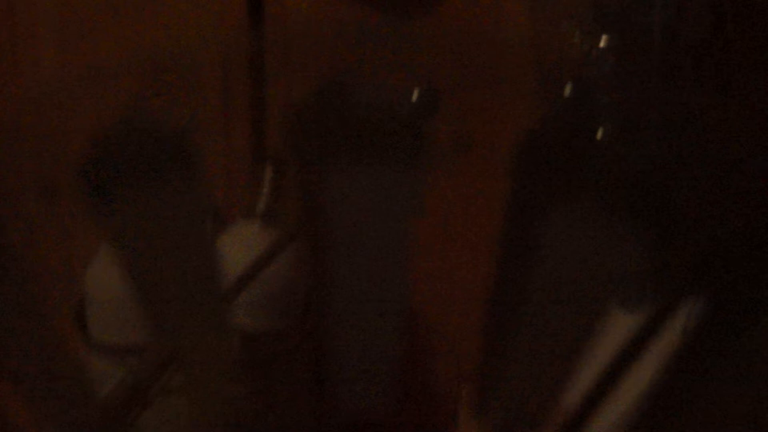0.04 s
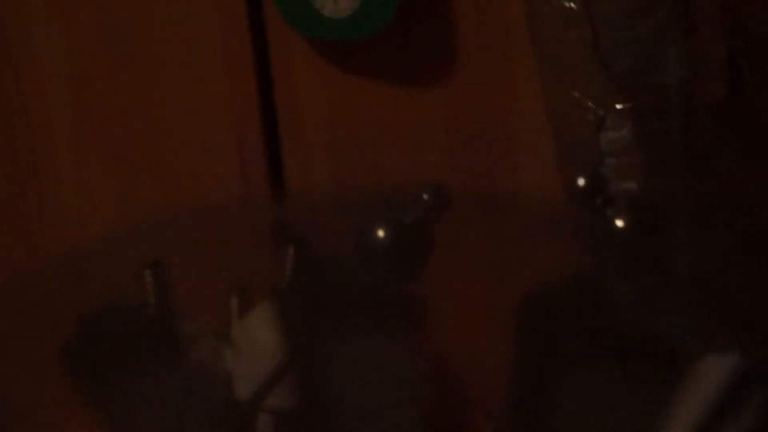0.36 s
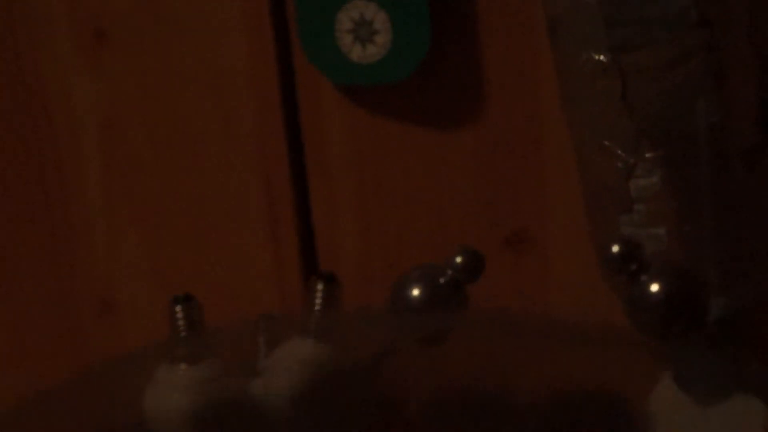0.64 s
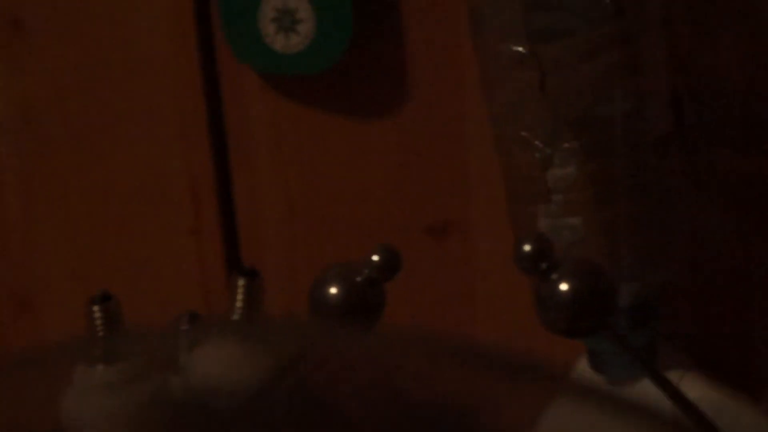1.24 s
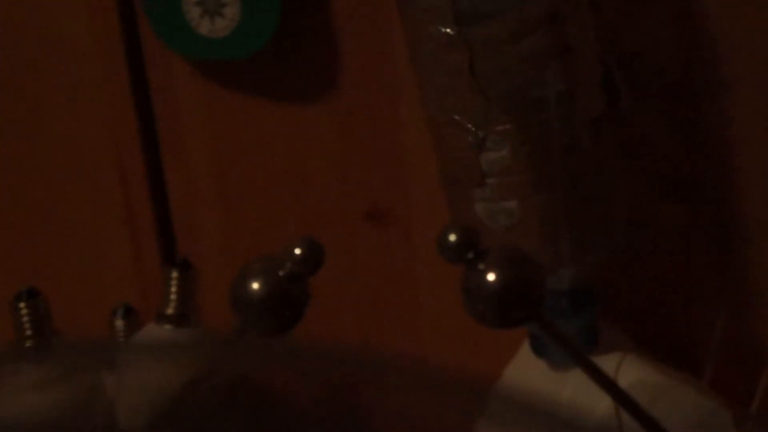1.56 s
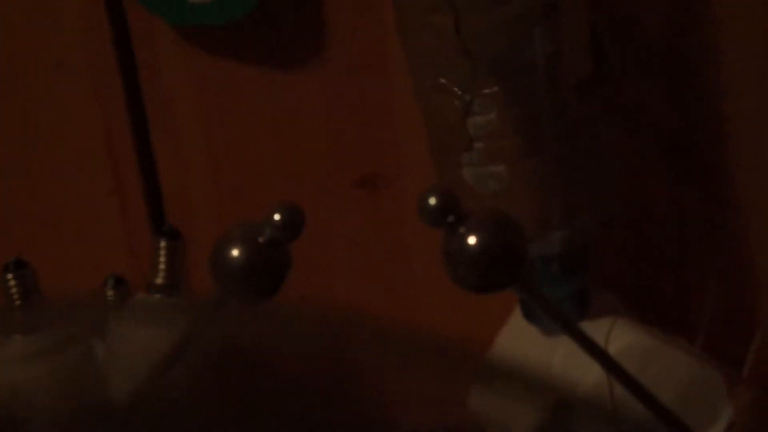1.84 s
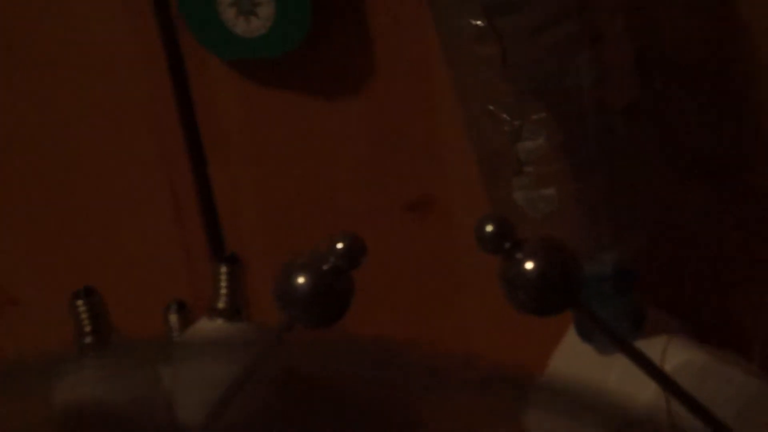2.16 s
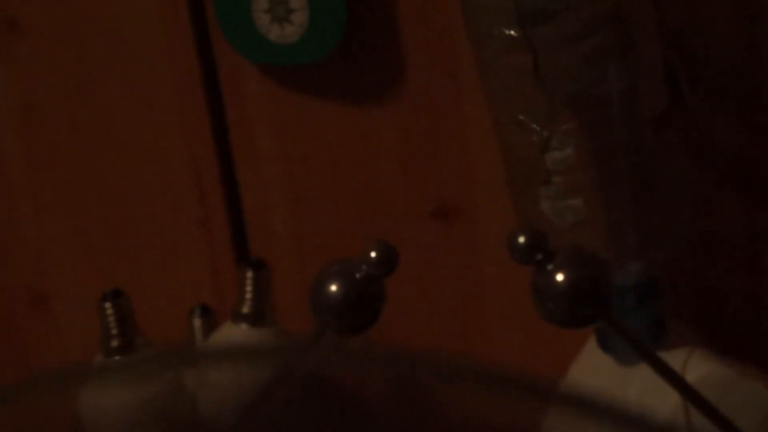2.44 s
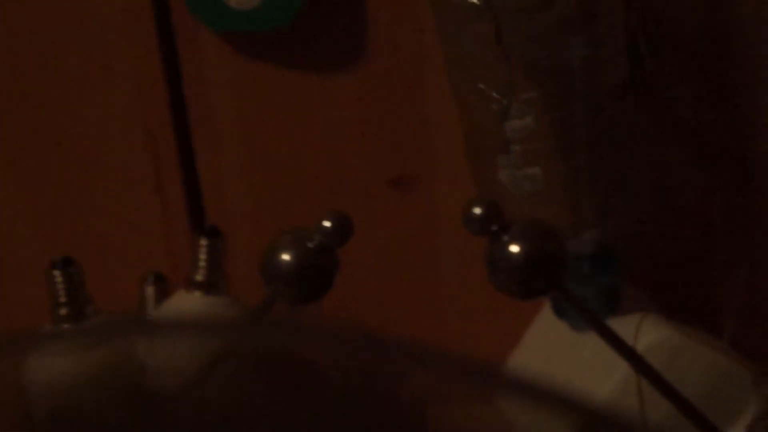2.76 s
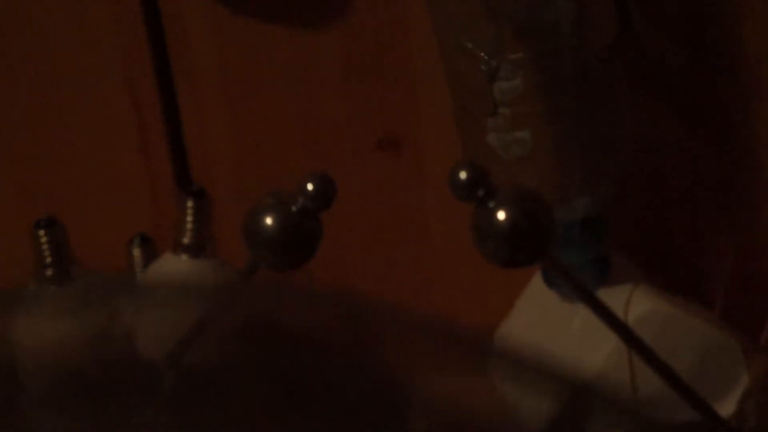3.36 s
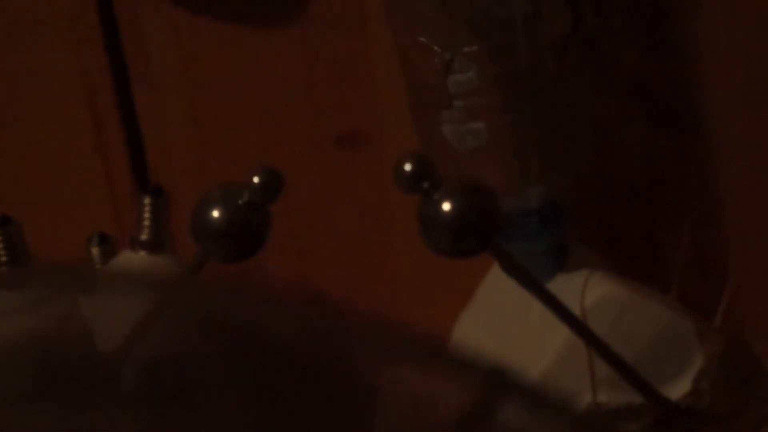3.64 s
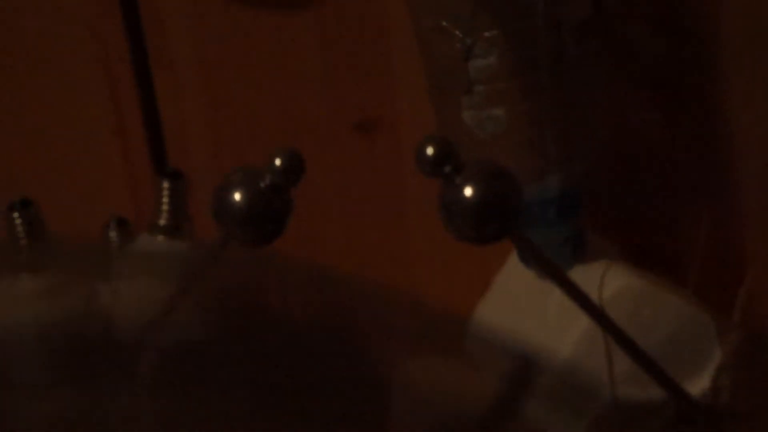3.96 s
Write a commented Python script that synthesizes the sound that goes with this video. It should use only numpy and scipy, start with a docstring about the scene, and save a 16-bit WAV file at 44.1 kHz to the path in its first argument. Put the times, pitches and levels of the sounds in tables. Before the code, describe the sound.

A hand-turned electrostatic machine scrapes, knocks and snaps with sparks, ever faster.

```python
"""Hand-cranked electrostatic machine

Close by in a small room, the machine is gripped with a clink and a clunk and starts with a squeak.
Wire brushes scrape the turning plates, swelling with each turn, and the drive rumbles and knocks
as it speeds up. Sparks snap between the ball electrodes, ever more often."""
import sys
import numpy as np
from scipy import signal
from scipy.fft import rfft, irfft
from scipy.io import wavfile

SR = 44100
rng = np.random.default_rng(int(sys.argv[2]) if len(sys.argv) > 2 else 0)


def waveform_to_disk(signal):
    """Save audio, clipped to [-1, 1], as 16-bit WAV at the path in sys.argv[1]."""
    frames = np.transpose(np.atleast_2d(signal))
    scaled = np.clip(frames, -1, 1) * 32767
    samples = np.round(scaled).astype(np.int16)
    wavfile.write(sys.argv[1], SR, samples)


N = 176400
T = np.arange(N) / SR
HZ = np.maximum(np.fft.rfftfreq(N, 1 / SR), 1)
ROOM_T60_S = 0.18


def amp(db):
    """Gain of a level in dB."""
    return 10 ** (np.asarray(db) / 20)


def unit(x):
    """Scale to rms 1."""
    return x / np.sqrt(np.mean(x ** 2))


def curve(rows, column=1):
    """Automation: straight lines between breakpoints, held flat before and after them."""
    rows = np.array(rows)
    return np.interp(T, rows[:, 0], rows[:, column])


def fade(t60_s):
    """Exponential decay."""
    return np.exp(-np.minimum(np.log(1000) * T / t60_s, 60))


def swell(peak_s, half_width_s):
    """Bell-shaped rise and fall around a moment."""
    return np.exp(-((T - peak_s) / half_width_s) ** 2)


def pan(db):
    """Left and right gains for a level difference."""
    return amp(np.array([[db], [-db]]) / 2)


def wander(rate_hz):
    """Smooth random modulation with rms 1."""
    return unit(irfft(rfft(rng.standard_normal(N)) / (1 + (HZ / rate_hz) ** 2) ** 2, N))


def colour(points):
    """Minimum-phase EQ through (freq_hz, gain_db) points."""
    hz, db = np.array(points).T
    cepstrum = irfft(np.log(amp(np.interp(np.log(HZ), np.log(hz), db))), N)
    cepstrum[1:N // 2] *= 2
    cepstrum[N // 2 + 1:] = 0
    return np.exp(rfft(cepstrum))


def resonances(rows):
    """Frequency response of a set of steep-sided resonances."""
    power = 0
    for hz, width, db in rows:
        detuning = (HZ / hz - hz / HZ) * hz / width / 2
        power = power + (amp(db) / (1 + 2 * detuning ** 2)) ** 2
    return np.sqrt(power)


def ringing(modes):
    """One decaying sine for each struck mode, building up over about one cycle."""
    return np.array([amp(db) * np.sin(2 * np.pi * hz * T) * fade(t60) * (1 - np.exp(-T * hz))
                     for hz, db, t60 in modes])


def stereo(mid_side, side_db):
    """Left and right from a mid and a side signal."""
    return mid_side[0] + amp(side_db) * mid_side[1] * np.array([[1], [-1]])


def tail(t60_s, side_db):
    """Diffuse stereo decay of unit energy."""
    return unit(stereo(rng.standard_normal((2, N)), side_db) * fade(t60_s)) / np.sqrt(N)


def in_room(x, wet_db, side_db):
    """A sound plus the small room's reverb."""
    return x + amp(wet_db) * irfft(rfft(x) * rfft(tail(ROOM_T60_S, side_db)), N)


def add(out, x, start_s):
    """Mix a sound in at a time."""
    i = max(int(round(start_s * SR)), 0)
    out[..., i:] += x[..., :N - i]


def friction(response, grain, flutter_db, flutter_hz, side_db, pan_db):
    """Dense slips of uneven size, coming in bunches, ring a body with many small resonances."""
    slips = rng.standard_normal((2, N))
    slips *= np.exp(grain * np.repeat(rng.standard_normal(N // 20 + 1), 20)[:N])
    slips *= amp(flutter_db * wander(flutter_hz))
    ripple = amp(3 * wander(160)[:len(HZ)])  # small resonances of plates and frame
    return unit(irfft(rfft(stereo(slips, side_db)) * response * ripple, N)) * pan(pan_db)


# Fader of the handling rustle: time_s, level_db
GRIP_FADER = [(.125, -52), (.28, -48.5), (.35, -63.5)]
# Its EQ: freq_hz, gain_db
GRIP_EQ = [(60, -6.5), (520, 1.5), (1000, -5), (1380, 0), (2050, -3.5), (2600, -28), (8000, -18),
           (11000, -35)]


def grip():
    """A soft rustle as the machine is taken in hand."""
    rustle = friction(colour(GRIP_EQ), grain=0.34, flutter_db=-3.2, flutter_hz=40,
                      side_db=-9, pan_db=0.5)
    return rustle * amp(curve(GRIP_FADER))


# Clinks of loose metal: start_s, level_db, t60_s
CLINK_HITS = [(0.1234, -47.5, 0.13), (2.957, -35.5, 0.032), (3.8587, -13, 0.0072)]
# Modes of that metal: pitch_hz, level_db
METAL_MODES = [(1980, 5), (2180, 7), (2480, 0.5), (3150, -6.5), (7865, -7)]


def clinks():
    """Loose metal rings briefly, shorter when held tight."""
    out = np.zeros(N)
    ring = sum((-1) ** k * amp(db) * np.sin(2 * np.pi * hz * T)
               for k, (hz, db) in enumerate(METAL_MODES))
    for start, db, t60 in CLINK_HITS:
        add(out, amp(db) * ring * fade(t60), start)
    return in_room(out, wet_db=-7, side_db=13)


# Knocks from play in the drive: start_s, level_db, tilt_db_per_octave
KNOCK_HITS = [(.145, -16, -1), (2.112, -27.5, -13), (2.541, -13, 3.5), (2.755, -7.5, 0), (2.83, -9, -1.5),
              (2.958, -11.5, -3.5), (3.028, -15.5, -7.5), (3.116, -9, -5.5), (3.244, -10.5, -2.5),
              (3.334, -8, 1), (3.5356, 4.5, 2.5), (3.569, -4.5, -3), (3.628, -12, -4.5),
              (3.815, -9.5, -6.5), (3.9643, -2, 0)]
# Modes of the knocked frame: pitch_hz, level_db, t60_s
FRAME_MODES = [(130, -26.5, 0.097), (279.6, -18.5, 0.081), (450, -0.5, 0.049), (982, 0.5, 0.047),
               (1058, -3.5, 0.077), (1163, -1.5, 0.05), (1380, 2, 0.047), (1473, -2, 0.057),
               (1844, -7, 0.049), (3190, -5, 0.02)]


def knocks(gain_db=-20.5, crack_db=-14.98):
    """Each knock cracks and rings the frame, harder contacts more brightly."""
    out = np.zeros(N)
    rings = ringing(FRAME_MODES)
    octaves = np.log2(np.array(FRAME_MODES)[:, 0] / 1000)
    burst = rng.standard_normal(N) * fade(0.045)
    crack = irfft(rfft(burst) * colour([(200, -12), (3500, 10.5), (7000, -3)]), N)
    for start, db, tilt in KNOCK_HITS:
        knock = amp(tilt * octaves) @ rings + amp(crack_db) * crack
        add(out, amp(db + gain_db) * knock, start)
    return out


# Modes of the crank: pitch_hz, level_db, t60_s
CRANK_MODES = [(237, -38.5, 0.075), (444, -20, .045), (768, -25.5, 0.041), (1395, -25.5, .025),
               (1766, -26, .022), (3110, -21.5, 0.011), (5580, -41.5, .012)]


def clunk(start_s=0.4035, rattle_t60_s=0.023, rattle_above_hz=2500):
    """The crank clunks into the hand's grip and rattles briefly in its bearing."""
    out = np.zeros(N)
    ring = ringing(CRANK_MODES).sum(axis=0)
    rattle = unit(rng.standard_normal(N) * fade(rattle_t60_s)) / np.sqrt(N)
    rattle_response = np.minimum(HZ / rattle_above_hz, 1) * rfft(rattle)
    add(out, irfft(rfft(ring) * (1 + rattle_response), N), start_s)
    return out


def impacts_in_room(impacts, low_cut_hz=156):
    """Impacts lose their deepest bass and sound in the small room."""
    low_cut = signal.butter(2, low_cut_hz, "high", fs=SR, output="sos")
    return in_room(signal.sosfilt(low_cut, impacts), wet_db=-6.5, side_db=-7)


# Resonances of the bearing and of the base: centre_hz, width_hz, gain_db
BEARING_BANDS = [(988, 165, -1), (1050, 100, 1.5), (1306, 98, 1), (1353, 113, 3), (1440, 40, 9),
                 (1760, 1750, -6)]
BASE_BANDS = [(54, 150, -21), (127.5, 33, -14), (209, 140, -11.5), (302, 69, -8.5), (423.7, 92, 1),
              (515, 40, -5), (599, 257, -7)]
# Faders of the chafe and of the rumble: time_s, level_db
CHAFE_FADER = [(.44, -53.5), (.62, -44), (1.2, -44), (1.8, -45.5), (2.0, -38.5), (2.25, -44), (3.36, -39.5),
               (4.0, -36.5)]
RUMBLE_FADER = [(.38, -56), (.75, -49.5), (1.1, -50.5), (1.7, -55.5), (2.1, -47), (2.45, -53), (2.85, -46),
                (3.5, -45), (3.85, -35.5), (4.0, -52)]


def drive(rumble_db=-1.5):
    """The bearing chafes and the base rumbles under the crank."""
    chafe = friction(resonances(BEARING_BANDS), grain=0.41, flutter_db=2, flutter_hz=32.8,
                     side_db=-11.5, pan_db=0.1)
    rumble = friction(resonances(BASE_BANDS), grain=0.34, flutter_db=2.5, flutter_hz=29.3,
                      side_db=-11.5, pan_db=-0.5)
    return chafe * amp(curve(CHAFE_FADER)) + rumble * amp(curve(RUMBLE_FADER) + rumble_db)


# EQ of the brush hiss: freq_hz, gain_db
HISS_EQ = [(600, -25.5), (1800, -12), (2800, -4.5), (5000, -0.5), (6100, -0.5), (6900, 0), (7600, -1.5),
           (8700, 2.5), (11000, 1)]
# Rasping resonances of the brushes: centre_hz, width_hz, gain_db
RASP_BANDS = [(2628, 96, -1), (3137, 180, -0.5), (3465, 297, 1.5), (3760, 550, -1.5), (4604, 140, -3.5),
              (5180, 460, -5), (6940, 270, -4)]
# Fader of the brushes, rising with speed: time_s, level_db
BRUSH_FADER = [(.45, -67.5), (.485, -47), (.64, -44.5), (.8, -45), (.88, -42.5), (2.1, -42), (2.6, -40),
               (4.0, -36.5)]
# Swells where the plates press on the brushes: peak_s
PLATE_PRESSES = [0.919, 1.02, 1.30, 1.61, 1.94, 2.21, 2.31, 2.431, 2.551, 2.769, 3.74]


def brushes(hiss_db=5, hiss_build_s=0.11, hiss_swell_db=1.5, rasp_swell_db=6):
    """Wire brushes hiss on the plates and rasp louder whenever the plates press on them."""
    hiss = friction(colour(HISS_EQ), grain=0.09, flutter_db=1.95, flutter_hz=39, side_db=2, pan_db=-4)
    turning_s = np.maximum(T - BRUSH_FADER[0][0], 0)
    hiss *= 1 - np.exp(-turning_s / hiss_build_s)  # follows the rasp as the plates gather speed
    rasp = 0
    for hz, width, db in RASP_BANDS:
        ring = friction(resonances([(hz, width, 0)]), grain=0.17, flutter_db=2.5, flutter_hz=41.5,
                        side_db=-4, pan_db=-2.5)
        rasp = rasp + ring * np.sqrt(width) * amp(db + wander(6.9))  # each band drifts by about 1 dB
    pressure = sum(swell(peak, half_width_s=0.041) for peak in PLATE_PRESSES)
    hiss *= amp(hiss_db + hiss_swell_db * pressure)
    rasp = unit(rasp) * amp(rasp_swell_db * pressure)
    return (hiss + rasp) * amp(curve(BRUSH_FADER))


# Glide of the bearing's squeak: time_s, pitch_hz, level_db
SQUEAK_GLIDE = [(.458, 1236, -46), (.47, 1255, -37.5), (.512, 1268, -34), (.535, 1239, -36.5),
                (.572, 1230, -35), (.595, 1366, -36), (.632, 1385, -52)]


def squeak(jitter=0.0139, overtone_db=-29, flutter_db=2.3):
    """The bearing sings unsteadily as it starts to turn."""
    pitch_hz = curve(SQUEAK_GLIDE) * (1 + jitter * wander(170))
    phase = 2 * np.pi * np.cumsum(pitch_hz) / SR
    tone = np.sin(phase) + amp(overtone_db) * (np.sin(2 * phase) + np.sin(3 * phase))
    gate = (T > SQUEAK_GLIDE[0][0]) & (T < SQUEAK_GLIDE[-1][0])
    level_db = curve(SQUEAK_GLIDE, column=2) + flutter_db * wander(220)
    return np.sqrt(2) * tone * gate * amp(level_db)


# Short chirps of the chafing bearing: peak_s, level_db
BEARING_CHIRPS = [(.66, -40.5), (0.771, -39.5), (1.37, -40), (1.97, -35.5), (2.49, -36)]


def chirps(pitch_hz=1320, width_hz=91):
    """The bearing briefly rings at its squeaking pitch."""
    ring = friction(resonances([(pitch_hz, width_hz, 0)]), grain=0, flutter_db=0.5, flutter_hz=30,
                    side_db=-16, pan_db=0)
    return ring * sum(amp(db) * swell(peak, half_width_s=0.026) for peak, db in BEARING_CHIRPS)


# Sparks, nearly equally loud since all jump at the same breakdown voltage: start_s
SPARK_CUES = [1.1245, 1.6615, 2.3298, 2.46, 2.5738, 2.6432, 2.7608, 2.8483, 2.9333, 3.0451, 3.131, 3.2091,
              3.2768, 3.3348, 3.3844, 3.4299, 3.4954, 3.8595, 3.9045]
# EQ of a spark's snap: freq_hz, gain_db
SNAP_EQ = [(150, -31.5), (700, -7), (2000, -5), (4500, -4.5), (8600, -1.5), (9550, 6.5), (10200, -3),
           (11000, 3)]
# Early reflections off the plates and frame: delay_ms, left_db, right_db
SPARK_REFLECTIONS = [(0.945, -12, -13), (1.245, -7, -3), (1.87, -13, -7)]


def sparks(gain_db=3.6, stray_s=3.668, stray_db=-7):
    """Each discharge is a sharp pulse, thrown back by the machine's parts and faintly by the room."""
    pulses = np.zeros(N)
    for start, db in [(cue, 0) for cue in SPARK_CUES] + [(stray_s, stray_db)]:
        snap = 0.16 * rng.standard_normal(N) * fade(0.0012)  # its own jagged path colours each spark
        snap[0] = 1
        add(pulses, amp(db + gain_db) * snap / np.linalg.norm(snap), start)
    paths = 1 + sum(amp([[left], [right]]) * np.exp(-2j * np.pi * HZ * ms / 1000)
                    for ms, left, right in SPARK_REFLECTIONS)
    scatter = amp(-3.5) * tail(t60_s=0.015, side_db=-2)
    room = amp(-8) * tail(ROOM_T60_S, side_db=-2)
    return irfft(rfft(pulses) * colour(SNAP_EQ) * (paths + rfft(scatter + room)), N) * pan(-0.9)


def scene():
    """The whole machine in stereo."""
    rubbing = grip() + chirps() + brushes() + drive() + squeak()
    impacts = impacts_in_room(clunk() + knocks()) + clinks()
    return rubbing + impacts + sparks()


def record(dry, start_s=0.121, fade_in_s=0.002, high_cut_hz=11120):
    """The mix opens after a short silence; the top is cut steeply."""
    opened = dry * np.clip((T - start_s) / fade_in_s, 0, 1)
    high_cut = signal.firwin(401, high_cut_hz, fs=SR)
    return signal.fftconvolve(opened, high_cut[None], mode="same", axes=1)


dry = scene()
out = record(dry)
waveform_to_disk(out)
```